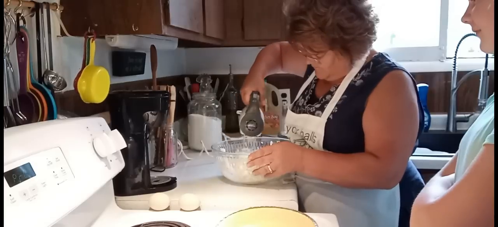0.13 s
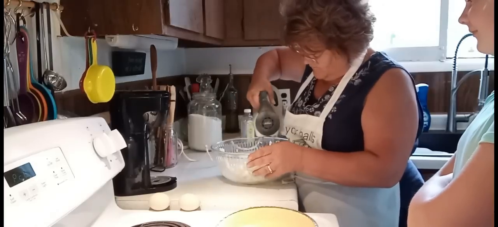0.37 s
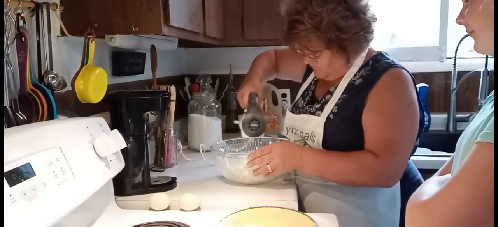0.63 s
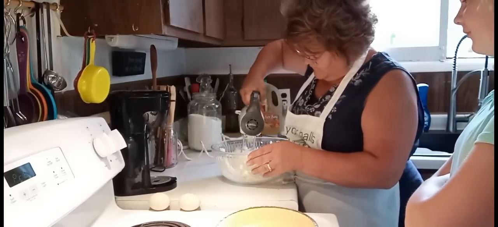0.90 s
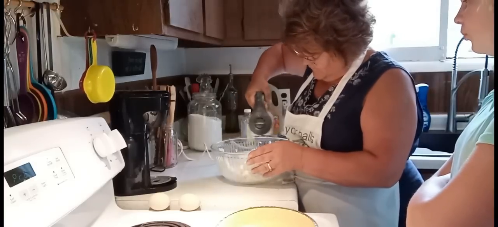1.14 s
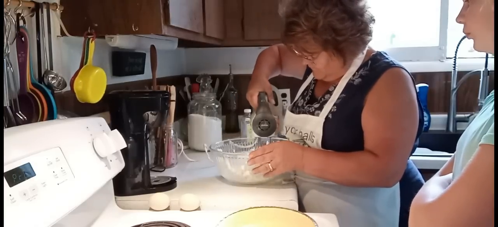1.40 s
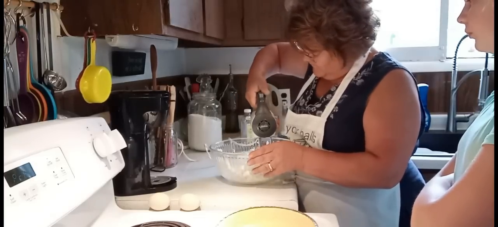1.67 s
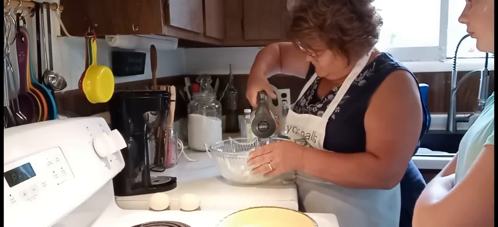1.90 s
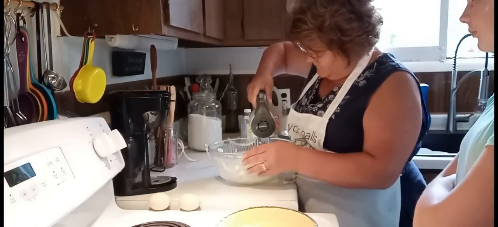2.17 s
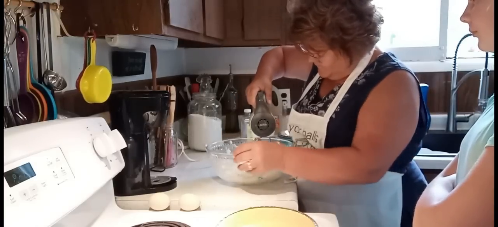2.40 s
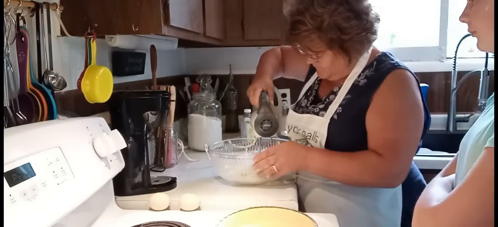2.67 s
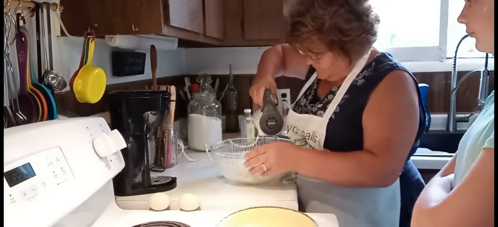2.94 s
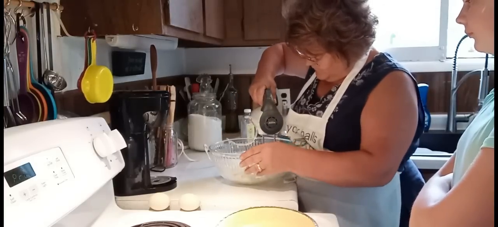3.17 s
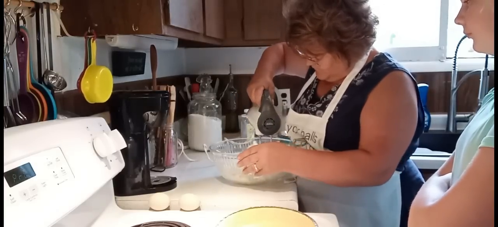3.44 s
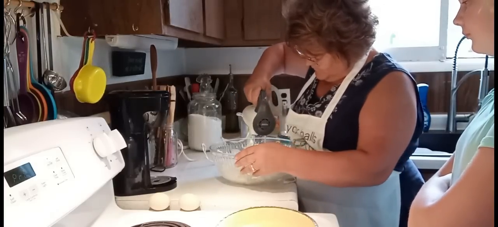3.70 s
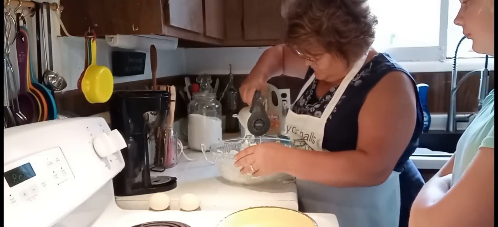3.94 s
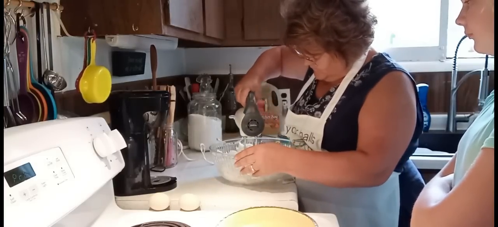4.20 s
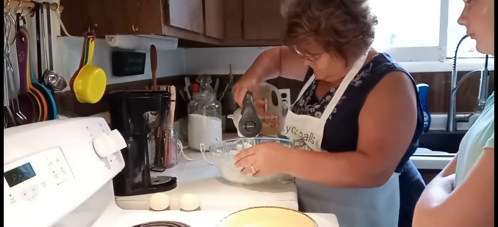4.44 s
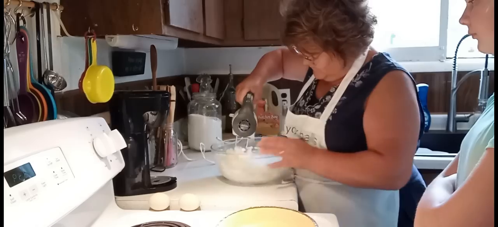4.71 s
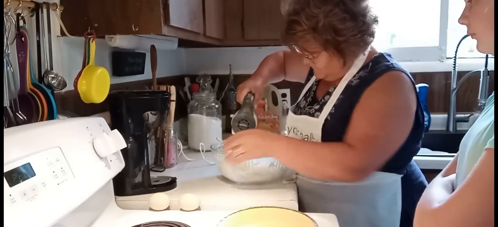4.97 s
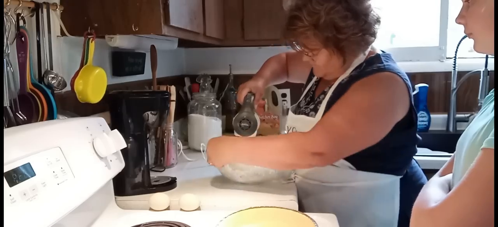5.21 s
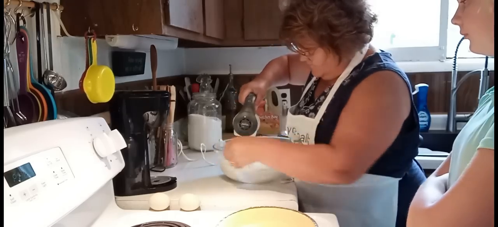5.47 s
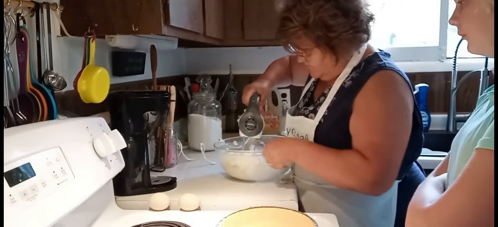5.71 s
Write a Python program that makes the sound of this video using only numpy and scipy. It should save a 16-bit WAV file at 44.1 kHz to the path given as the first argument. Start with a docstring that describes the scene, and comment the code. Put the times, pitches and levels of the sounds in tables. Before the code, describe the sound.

A handheld electric mixer whines and hisses without pause, its pitch sagging and rising, while beaters knock and clink on a glass bowl of batter.

```python
"""A handheld electric mixer whines and hisses as it whips batter in a glass bowl in a kitchen.
The rotor slows and speeds up with the load; its slot tone, split by the mains ripple, and its rotor
tones are sines that follow the speed, over shaped noise for the fan, the gears and the churning batter.
The beaters knock on the bowl about once a turn, ringing its modes; wires tap the glass in bright bursts
and drops spatter as short puffs of noise. Both channels carry the same single-microphone sound."""
import sys
import numpy as np
from scipy import signal
from scipy.fft import rfft, irfft
from scipy.io import wavfile
from scipy.ndimage import uniform_filter1d

SR = 44100
rng = np.random.default_rng(int(sys.argv[2]) if len(sys.argv) > 2 else 0)


def boost(x):
    """Linear amplitude factor 10**(x/20) for a level x in decibels (scalar or array-like)."""
    u = np.asarray(x, float) / 20
    return 10 ** u


def put_to_file(sound):
    """Save the sound as 16-bit audio at rate SR, in the file named by the first command-line argument."""
    columns = np.atleast_2d(sound).T  # one column per channel
    safe = np.clip(columns, -1, 1)
    whole_steps = np.round(safe * 32767)
    wavfile.write(sys.argv[1], SR, whole_steps.astype(np.int16))


N = 257983
GEARING = 11  # rotor turns per beater turn


def rms_one(x):
    """Scale to an rms of 1."""
    return x / np.sqrt(np.mean(x ** 2) + 1e-20)


def curve(rows):
    """Straight lines through (t/s, value) points, one value per sample."""
    s, value = np.transpose(rows)
    return np.interp(np.arange(N) / SR, s, value)


def filtered(x, order, hz, kind):
    """Butterworth filter."""
    return signal.sosfilt(signal.butter(order, hz, kind, fs=SR, output="sos"), x)


def coloured(spectrum, peaks=()):
    """Noise with a given spectrum and resonant lifts; rms 1."""
    hz = np.maximum(np.fft.rfftfreq(N, 1 / SR), 10)
    points_hz, points_db = np.transpose(spectrum)
    level_db = np.interp(np.log(hz), np.log(points_hz), points_db)
    for top_hz, width_hz, lift_db in peaks:
        level_db += lift_db / (1 + (2 * (hz - top_hz) / width_hz) ** 2)
    return rms_one(irfft(rfft(rng.standard_normal(N)) * boost(level_db), N))


def drift(rate_hz):
    """Slow random wander with a spread of 1: noise through two equal low-pass poles."""
    thin = 40  # samples between the points of the wander
    r = np.exp(-2 * np.pi * rate_hz * thin / SR)
    slow = signal.lfilter([1], [1, -2 * r, r * r], rng.standard_normal(N // thin + 2002))
    slow = rms_one(slow[2000:])  # leave out the settling
    return np.interp(np.arange(N) / thin, np.arange(len(slow)), slow)


def ring(force, hz, t60):
    """A mode set ringing by a force, decaying 60 dB in t60 seconds."""
    r, w = boost(-60 / (t60 * SR)), 2 * np.pi * hz / SR
    return signal.lfilter([0, np.sin(w)], [1, -2 * r * np.cos(w), r * r], force + 1e-18)


def motor_speed():
    """Rotor speed in turns per second under the changing load, smoothed by the rotor's inertia."""
    # the motor under its load: (t/s, speed/turns per s)
    motor = [(0.0, 251.2), (0.16, 226.8), (0.25, 215.4), (0.34, 213.5), (0.44, 217.8), (0.66, 246.2),
             (0.72, 248.6), (0.78, 239.1), (0.9, 215.8), (1.05, 198.7), (1.14, 192.6), (1.22, 197.9),
             (1.3, 210.3), (1.46, 220.2), (1.62, 215.3), (1.9, 221.2), (2.15, 215.7), (2.31, 216.5),
             (2.44, 227.4), (2.7, 228.3), (2.95, 214.0), (3.3, 208.2), (3.6, 205.2), (3.86, 195.9),
             (4.12, 198.7), (4.32, 204.9), (4.8, 208.2), (4.95, 220.9), (5.16, 226.4), (5.5, 240.3),
             (5.58, 239.4), (5.7, 217.5), (5.77, 214.7), (5.85, 214.2)]
    inertia_s = .08
    return uniform_filter1d(curve(motor), size=int(inertia_s * SR), mode="nearest")


def slot_whine(turns, speed):
    """The slot tone is pulsed by the magnetic pull at twice the mains rate, which splits it into lines;
    they keep roughly in step, so the whine buzzes, and each swells as it crosses a casing resonance."""
    # level of the whole whine: (t/s, level/dB)
    whine = [(0, -35), (.7, -33.5), (1.15, -33.5), (1.5, -34), (2.1, -33.5), (2.65, -32), (3.3, -34.5),
             (3.9, -33), (4.3, -34), (5.0, -33.5), (5.5, -36), (5.85, -33)]
    # lines of the whine: (ripple steps from the slot tone, rounded to whole steps in use; level/dB)
    whine_lines = [(-3.5, -16), (-1, -2.5), (0, -3), (1, -2.5), (2, -7.5), (5, -16)]
    # how well the casing radiates the whine: (f/Hz, gain/dB)
    casing = [(2000, -8), (2245, -1.5), (2290, -6.5), (2360, -3), (2425, -7), (2490, -2), (2560, -.5),
              (2610, 0.5), (2690, -1.5), (2775, 7), (2835, 4), (2900, -6), (3300, -9)]
    slots, ripple_hz = 12, 120
    level_db = curve(whine)
    ripple = ripple_hz * np.arange(N) / SR
    out = np.zeros(N)
    for step, line_db in whine_lines:
        step = round(step)
        casing_db = np.interp(slots * speed + step * ripple_hz, *np.transpose(casing))
        phase = 2 * np.pi * (slots * turns + step * ripple)
        tone = np.sqrt(2) * np.sin(phase + .5 * drift(2) + .2 * drift(30))
        waver_db = 2.0 * drift(30) + 1.6 * drift(7.6)
        out += boost(level_db + line_db + casing_db + waver_db) * tone
    return out


def rotor_tones(turns, speed):
    """Multiples of the rotor speed swell and fade as the mixer moves about; high ones blur with
    speed jitter. They sink when the load lifts and the rotor runs free."""
    # tones from bars, brushes and fan blades: (multiple of the rotor speed, level/dB before the load)
    tones = [(4, -60), (5, -62), (6, -60.0), (8, -59.0), (10, -54), (15, -60.0), (18, -62.0), (20, -59.0),
             (21, -59.0), (22, -57.0), (24, -55), (25, -60.0), (26, -61.0), (28, -62.0), (29, -64.0),
             (30, -62.0), (31, -63.0), (32, -62.0), (33, -61.0), (34, -59.0), (35, -56), (36, -57.0),
             (37, -64.0), (39, -63.0), (40, -64.0), (41, -63.0), (42, -64.0), (44, -68.0), (45, -65.0),
             (46, -66.0), (47, -64.0), (48, -61)]
    # a tone stands out for a while: (middle t/s, length/s, multiple of the rotor speed, extra level/dB)
    swells = [(.25, .3, 4, 8), (1.2, .25, 4, 8), (1.7, .3, 4, 11), (4.03, .5, 4, 12), (4.47, .72, 5, 17),
              (.45, .3, 10, 6), (1.92, .22, 10, 10), (5.5, .7, 10, 6), (1.12, .36, 24, 7),
              (3.65, .3, 24, 6), (4.15, .3, 24, 6), (4.4, 1.0, 48, 4)]
    t = np.arange(N) / SR
    turns = turns + .0012 * drift(25)  # speed jitter
    load_db = 3.6 - .3 * np.maximum(speed - 222, 0)
    out = np.zeros(N)
    for multiple, tone_db in tones:
        swell_db = np.zeros(N)
        for middle, length, swelling, extra_db in swells:
            if swelling == multiple:
                swell_db += extra_db * np.exp(-(2 * (t - middle) / length) ** 4)
        tone = np.sin(2 * np.pi * (multiple * turns + rng.random()))
        out += boost(tone_db + load_db + swell_db + 2.0 * drift(5.8)) * tone
    return np.sqrt(2) * out


def fan_and_gear_hiss(turns, speed):
    """Cooling air and gear hiss rise with speed; they flicker and throb a little with each beater turn."""
    # colour of the hiss: (f/Hz, relative level per Hz/dB)
    hiss_colour = [(35, -78), (60, -39), (233, -15.5), (315, -15), (621, 0), (862, -6.5), (1250, -7),
                   (1440, -6.5), (2650, -5.5), (3850, -9), (4860, -7.5), (6000, -12), (7400, -8),
                   (8510, -17), (16000, -23)]
    # housing resonances: (f/Hz, width/Hz, lift/dB)
    housing = [(548, 130, 4), (1024, 370, 3.5), (1253, 30, 9.5), (1707, 100, 4), (1995, 180, 4),
               (2580, 420, 6.5), (3110, 100, -6.5), (4820, 57, 11), (4986, 140, 5), (7850, 380, 5.5)]
    hiss_db = -30.5 + .11 * (speed - 215)  # .11 dB for each turn per s above a middling speed
    body = filtered(coloured(hiss_colour, housing), 2, 7500, "low")
    body = filtered(body, 2, 230, "high")
    top = filtered(coloured(hiss_colour), 2, 7500, "high")
    flicker_db = 0.76 * drift(14.0) + 0.29 * np.sin(2 * np.pi * turns / GEARING)
    return boost(hiss_db) * (body * boost(0.96 * flicker_db) + top * boost(-0.1 + 0.85 * flicker_db))


def gear_rasp():
    """The gear housing rasps: noise gathered mostly around 3 to 3.5 kHz, rising and falling in level."""
    # level of the rasp: (t/s, level/dB)
    rasp = [(0, -31.5), (.45, -39.5), (.68, -36.5), (1.35, -42), (2.6, -41), (3.7, -47), (4.5, -39.5),
            (5.0, -35.5), (5.4, -35.5), (5.62, -31), (5.85, -38)]
    colour = [(2600, -42), (3050, 2), (3240, 10), (3370, 5), (3500, 9.5), (3700, -19),
              (4500, -3), (4800, 2), (5200, 1.5), (5700, -7), (7000, -33)]  # (f/Hz, relative level/dB)
    return boost(curve(rasp)) * coloured(colour)


def drag_db():
    """Level of the beaters dragging through batter along the glass: each sets in fast, holds, dies away."""
    # drags: (start t/s, hold/s, level/dB)
    drags = [(0, 0.15, -34.5), (0.444, .01, -36), (.975, .02, -39.5), (1.28, .1, -30.5), (1.5, 0.16, -52),
             (1.75, 0.53, -52), (2.301, 0.57, -38), (2.811, 0.14, -32.5), (2.957, 0.32, -37),
             (3.27, .45, -41), (3.95, 0.036, -48.5), (4.621, 0.18, -42), (4.797, 0.2, -39),
             (4.95, 0.55, -46.5), (5.59, .27, -41)]
    attack_db_per_s, release_db_per_s, clear_of_glass_db = 600, 168, -67
    t = np.arange(N) / SR
    power = boost(2 * clear_of_glass_db)
    for start, hold, db in drags:
        rise_db = attack_db_per_s * np.maximum(start - t, 0)
        fall_db = release_db_per_s * np.maximum(t - start - hold, 0)
        power = power + boost(2 * (db - rise_db - fall_db))
    return 10 * np.log10(power)


def churn(turns):
    """Batter dragged along the glass: a lumpy low rush, stronger once in each beater turn."""
    # colour of the rush: (f/Hz, relative level per Hz/dB)
    batter = [(25, -40), (60, -8), (100, -16), (170, -2), (260, 2.5), (400, 4.5), (620, 6.5), (1000, -4),
              (2000, -12), (5000, -20)]
    throb = 1 + .33 * np.sin(2 * np.pi * turns / GEARING + 2.6 * drift(2.4))
    return boost(drag_db() + 0.77 * drift(28)) * throb * coloured(batter)


def spatter(turns):
    """Small drops of batter flung off the wires as puffs of noise, bunched once in each beater turn."""
    drops_per_s, decay_s = 90, .0024
    chance = drops_per_s / SR * (1 + np.sin(2 * np.pi * turns / GEARING))
    size_db = 3.6 * np.minimum(rng.exponential(1, N), 3.5)
    drops = (rng.random(N) < chance) * boost(size_db)
    envelope = signal.lfilter([1], [1, -np.exp(-1 / (decay_s * SR))], drops + 1e-18)
    puffs = envelope * rng.standard_normal(N)
    return boost(-50) * filtered(puffs, 2, 6500, "high")


def house_rumble():
    """A faint low rumble of the house: steady low noise."""
    return boost(-86) * coloured([(20, 10), (60, 0), (150, 0), (400, -30)])


def knocks(turns):
    """Batter cushions each blow: two wires land in quick succession and ring the bowl's modes."""
    # the hardest knocks of beater on bowl: (t/s, strength/dB)
    hard_knocks = [(.054, -28), (.126, -27), (.441, -24.5), (1.328, -21), (1.513, -29.5), (2.286, -25),
                   (2.464, -26.5), (2.513, -29.5), (2.821, -18), (2.864, -25), (2.937, -22), (2.991, -23),
                   (3.04, -28), (3.09, -19), (3.197, -22), (4.851, -22.5), (4.922, -26), (5.018, -26),
                   (5.072, -28), (5.116, -29), (5.169, -23.5), (5.217, -26), (5.305, -24), (5.495, -33),
                   (5.541, -39), (5.583, -26), (5.78, -28)]
    # modes of the bowl: (f/Hz, level/dB, t60/s)
    bowl = [(260, -8.5, 0.092), (378, -10.5, 0.16), (453, 0, 0.011), (632, -5, 0.17), (782, -9.5, 0.093),
            (1103, -7.5, 0.04), (1305, -21, 0.14), (1570, -25, 0.043)]
    hard_s, hard_db = np.transpose(hard_knocks)
    # lighter knocks, one a beater turn, follow the drag and give way near a hard one
    turn = np.flatnonzero(np.diff(np.floor(turns / GEARING)))
    crowded = np.abs(turn[:, None] / SR - hard_s).min(axis=1) <= .03
    light_db = drag_db()[turn] + 6 + 3 * rng.standard_normal(len(turn)) - 99 * crowded
    first = np.r_[(hard_s * SR).astype(int), turn]
    strength_db = np.r_[hard_db, light_db]
    gap_s = .006 + .003 * np.tanh(rng.standard_normal(len(first)))
    second = np.minimum(first + (SR * gap_s).astype(int), N - 1)
    out = np.zeros(N)
    for k, (hz, mode_db, t60) in enumerate(bowl):
        size = boost(strength_db + mode_db + 2 * rng.standard_normal(len(first)))
        blows = np.zeros(N)
        np.add.at(blows, first, size * (-1) ** k)  # neighbouring modes start with opposite signs
        np.add.at(blows, second, .5 * size * rng.standard_normal(len(first)))
        out += ring(blows, hz, t60)
    return filtered(out, 2, [190, 1500], "band")


def taps():
    """Wire on glass: short bright noise bursts around a centre pitch, some with a clear ring of the glass."""
    # taps: (t/s, strength/dB, centre f/Hz, ring against burst/dB)
    wire_taps = [(0.1222, -16, 4820, -6), (1.2643, -19, 3800, 10.5), (1.3321, -13.5, 5750, -16),
                 (1.924, -17.5, 4480, -4), (3.194, -18, 3120, -22), (3.584, -23, 4830, -4),
                 (4.8524, -17, 3400, -9), (5.02, -19, 3400, 0)]
    burst_t60, ring_t60, spread = .05, .04, 1.7  # s, s, band edges as a ratio to the centre
    out, age = np.zeros(N), np.arange(5000) / SR
    for s, strength_db, hz, ring_db in wire_taps:
        edges = [hz / spread, min(hz * spread, .45 * SR)]
        noise = rms_one(filtered(rng.standard_normal(len(age)), 1, edges, "band"))
        burst = noise * boost(-10.5 - 60 * age / burst_t60)
        clink = boost(ring_db - 10.5 - 60 * age / ring_t60) * np.sin(2 * np.pi * hz * age)
        at = round(s * SR)
        out[at:at + len(age)] += boost(strength_db) * (burst + clink)
    return out


def kitchen(x):
    """The room adds a dense tail of reflections, duller than the direct sound."""
    t60, first_reflection_s, wet_db = .3, .006, -13
    age = np.arange(SR // 2) / SR
    tail = rng.standard_normal(len(age)) * boost(-60 * age / t60) * (age > first_reflection_s)
    tail = signal.lfilter([1], [1, -.5], tail)  # duller
    tail = tail / np.sqrt(np.sum(tail ** 2))
    return x + boost(wet_db) * signal.fftconvolve(x, tail)[:N]


def scene():
    """Motor, batter and bowl at one spot, over a faint low rumble of the house."""
    speed = motor_speed()
    turns = np.cumsum(speed) / SR
    motor = kitchen(slot_whine(turns, speed)) + rotor_tones(turns, speed)
    motor = motor + fan_and_gear_hiss(turns, speed) + gear_rasp()
    batter = churn(turns) + spatter(turns)
    bowl = kitchen(knocks(turns) + taps())
    sound = motor + batter + bowl + house_rumble()
    return np.array([sound, sound])


def top_cut(x):
    """Nothing passes above the cut-off."""
    return signal.sosfilt(signal.butter(12, 17060, fs=SR, output="sos"), x)


def record(dry):
    """The microphone's sound with the bass rolled off below 90 Hz and the top cut steeply at 15.7 kHz."""
    x = filtered(dry, 2, 90, "high")
    x = signal.sosfilt(signal.ellip(14, .3, 75, 15700, fs=SR, output="sos"), x)
    return top_cut(x)


dry = scene()
out = record(dry)
put_to_file(out)
```